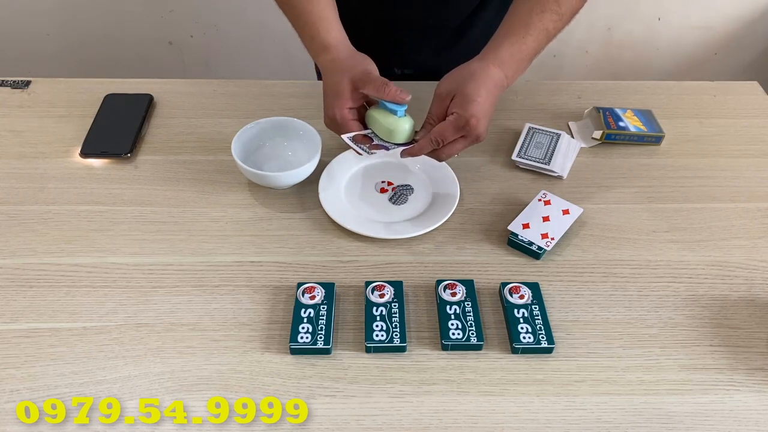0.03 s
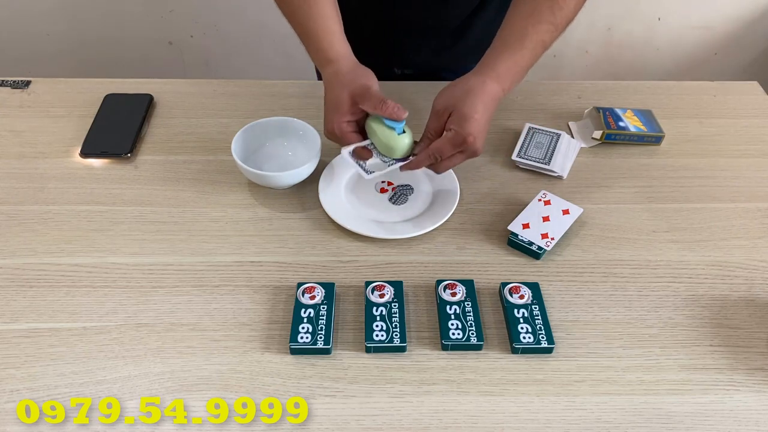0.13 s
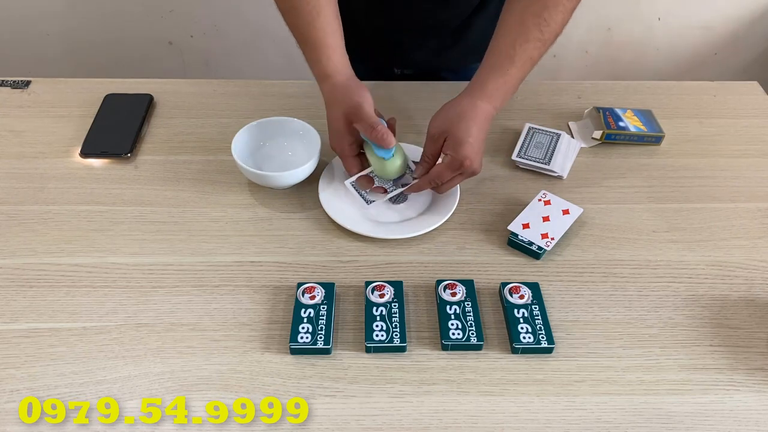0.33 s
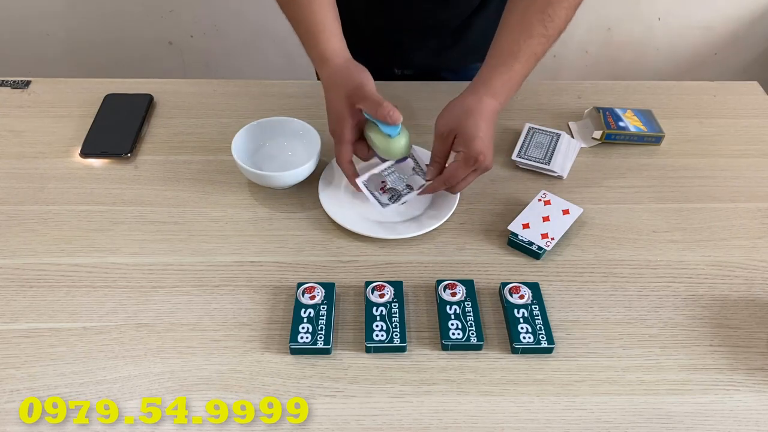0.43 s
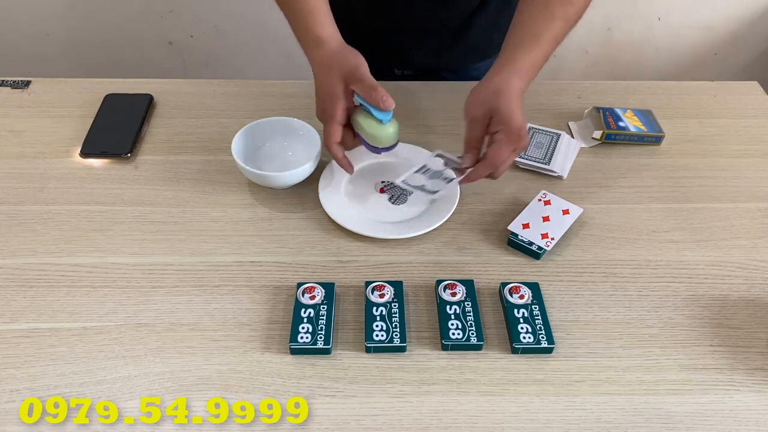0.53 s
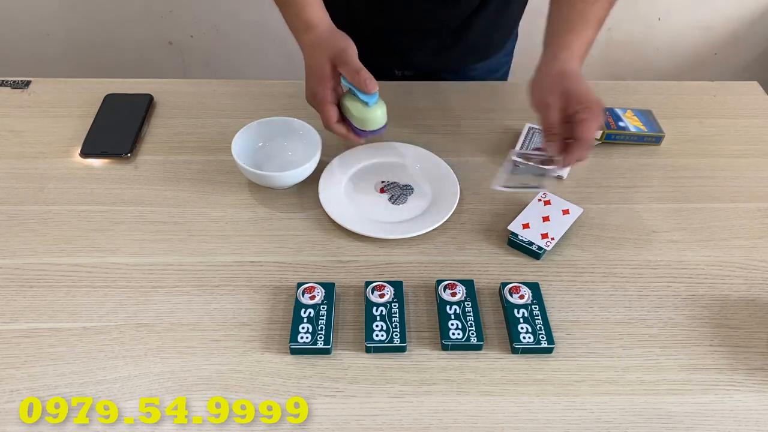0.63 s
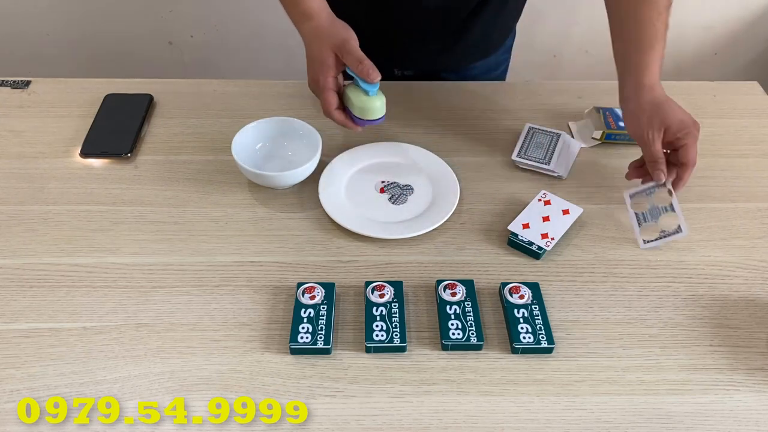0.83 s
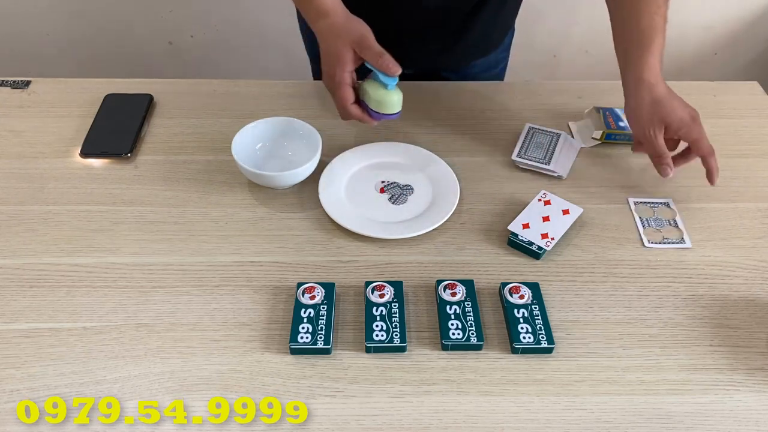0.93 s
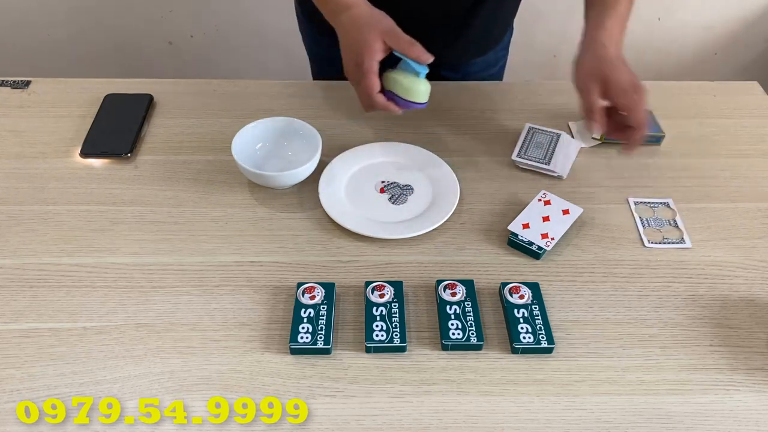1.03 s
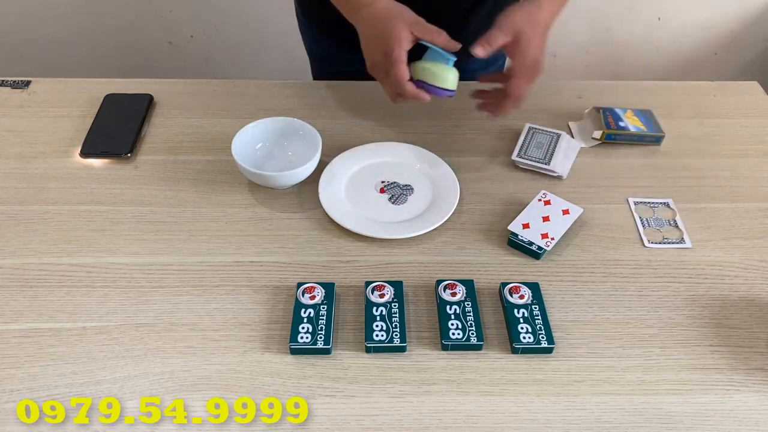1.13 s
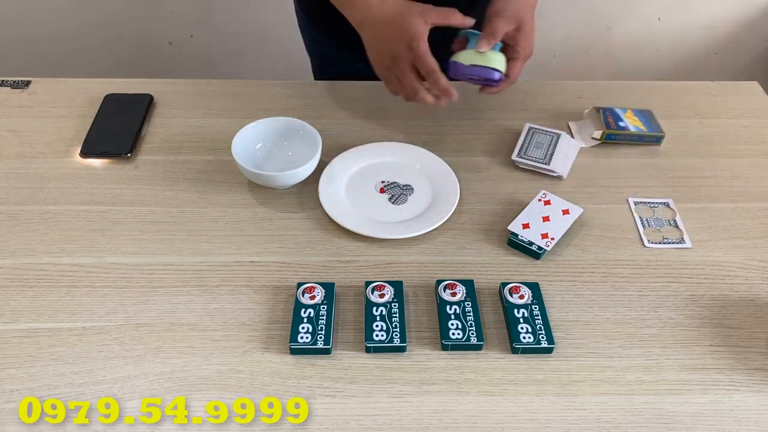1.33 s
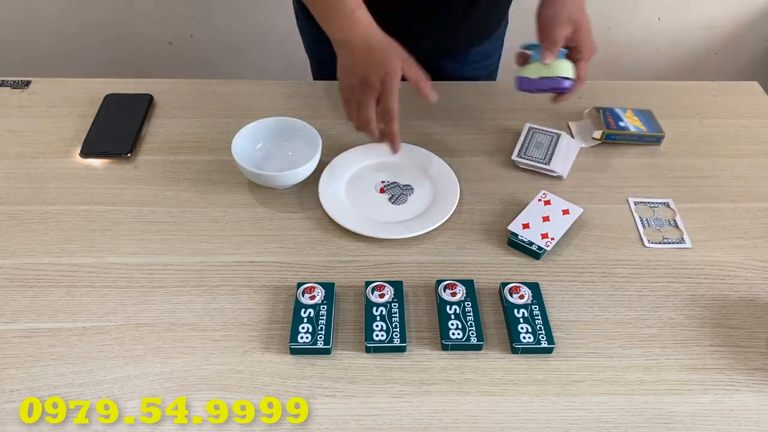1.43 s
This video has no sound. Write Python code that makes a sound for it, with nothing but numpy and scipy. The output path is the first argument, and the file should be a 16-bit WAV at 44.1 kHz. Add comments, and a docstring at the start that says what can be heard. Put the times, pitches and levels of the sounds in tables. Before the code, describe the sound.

Small creaky ticks lead to one hard, bright punch snap through card, followed by a lighter lever click, faint card taps on a table and quiet handling, in a reverberant room with low hum.

```python
"""A plastic lever punch is pressed through a playing card: its lever creaks in slips, each a ring and a tick,
the card tears with a crackle and a knock, and the die slams home in bright cracks and rings on.
The lever clicks and thumps back, card and fingers rub as grainy noise, and the dropped card taps the table.
Loose parts tick and skin squeaks as the punch is turned in the fingers; the hands bump dully.
A bare room echoes as fading noise; an appliance hums as a wavering sine over steady room noise."""
import sys
import numpy as np
from scipy import signal
from scipy.fft import rfft, irfft
from scipy.io import wavfile

SR = 44100
rng = np.random.default_rng(int(sys.argv[2]) if len(sys.argv) > 2 else 0)


def store_wav(level_fs):
    """Save 16-bit WAV to argv[1]."""
    pcm = np.round(np.clip(np.atleast_2d(level_fs), -1, 1) * 32767)
    wavfile.write(sys.argv[1], SR, pcm.T.astype(np.int16))


N = 66150
TIME = np.arange(N) / SR  # seconds
SIZE = 2 * N  # filters work at double length, so that tails do not wrap around
HZ = np.maximum(np.fft.rfftfreq(SIZE, 1 / SR), 1)

# In all tables, t60 is the time to fade by 60 dB.
# the lever slips under load: [t/s, level/dB]
LEVER_SLIPS = [(0.0665, -36), (0.081, -53), (0.1016, -28), (0.104, -27), (0.1067, -30), (0.111, -33),
               (0.16, -34.5), (0.194, -42.5), (0.201, -43)]
# tone of a slip's tick and of the tearing fibres: [f/Hz, level/dB]
TICK_SPECTRUM = [(200, -31.5), (500, -22.5), (800, -1.5), (1200, -6), (1700, 15.5), (2500, -4),
                 (5000, -2.5), (8000, -9), (14000, -4.5)]
# the die hits its stop and chatters: [t/s, level/dB, decay/s]
DIE_HITS = [(0.2138, -10.5, 0.00099), (0.2152, -5.5, 0.0015), (0.2181, -17.5, .002)]


def from_db(db):
    """Turn decibels into gain."""
    return 10 ** (np.asarray(db) / 20)


def rms_one(x):
    """Scale to an rms (average strength) of one."""
    return x / np.sqrt(np.mean(x ** 2) + 1e-20)


def at_hz(points, hz):
    """Read levels between the rows of a table, along a log-frequency axis."""
    table = np.array(points)
    return np.interp(np.log(hz), np.log(table[:, 0]), table[:, 1])


def causal(gain):
    """Build the filter that has these gains and answers only after its input (minimum phase)."""
    cepstrum = irfft(np.log(gain + 1e-9))
    folded = 2 * cepstrum[:len(gain) - 1]
    return np.exp(rfft(folded, len(cepstrum)) - cepstrum[0])


def colour(x, spectrum, tilt_db=0):
    """Filter with a spectrum, tilted in dB per octave from 1 to 16 kHz; keeps the power of white noise."""
    octaves = np.log2(np.clip(HZ, 1000, 16000))
    gain = rms_one(from_db(at_hz(spectrum, HZ) + tilt_db * octaves))
    return irfft(rfft(x, SIZE) * causal(gain))[:N]


def wide_noise(side_table):
    """White stereo noise: a shared middle plus an opposed side, whose share depends on frequency."""
    mid, side = rfft(rng.standard_normal((2, SIZE)))
    width = from_db(at_hz(side_table, HZ))
    pair = mid + width * side * [[1], [-1]]
    return irfft(pair / np.sqrt(1 + width ** 2))[:, :N]


def crack(start, db, decay_s, size=2048):
    """A contact: a dense run of tiny impacts, even in spectrum, that dies within milliseconds."""
    impacts = np.exp(-TIME[:size] / decay_s) * rng.choice([-1, 1], size)
    run = rfft(impacts, 2 * size)
    even = rms_one(irfft(run / np.abs(run))[:size])
    strength = from_db(db) * np.sqrt(decay_s * SR / 2 / size)  # longer runs carry more energy
    return strength * np.interp(TIME - start, TIME[:size], even, left=0, right=0)


def strike(hits, modes):
    """Each hit (t/s, level/dB) sets all the modes (f/Hz, level/dB, t60/s) ringing as fading sines."""
    out = np.zeros(N)
    for start, db in hits:
        first = int(start * SR) + 1
        age = TIME[first:first + N // 2] - start
        for hz, level, t60 in modes:
            fade = from_db(db + level - 60 * age / t60)
            out[first:first + len(age)] += fade * np.sin(2 * np.pi * hz * age)
    return out


def stroke(start, length):
    """Swell and fade of one hand movement."""
    return np.sin(np.pi * np.clip((TIME - start) / length, 0, 1))


def thin_bass(x):
    """Small plastic parts radiate no bass: a high-pass weakens what lies below 750 Hz."""
    return signal.sosfilt(signal.butter(2, 750, "high", fs=SR, output="sos"), x)


def lever_creak():
    """Stick and slip: each slip rings the loaded lever."""
    # resonances of the loaded lever: [f/Hz, level/dB, t60/s]
    lever_modes = [(1654, -4.5, 0.052), (1730, -15.5, 0.012), (1830, -17.5, 0.048)]
    return thin_bass(strike(LEVER_SLIPS, lever_modes))


def slip_ticks():
    """Each slip also makes a dry tick, a very short run of impacts."""
    tick_db, tick_decay_s = -3.5, 0.00073  # level against the slip
    ticks = sum(crack(start, db + tick_db, tick_decay_s) for start, db in LEVER_SLIPS)
    return colour(ticks, TICK_SPECTRUM)


def card_shear():
    """The card tears through: its fibres crackle, and the released shell knocks."""
    # the card gives way in quick tears: [t/s, level/dB]
    tears = [(0.2117, -19), (0.2128, -8)]
    # resonances of the shell's dull knock: [f/Hz, level/dB, t60/s]
    shell_modes = [(1020, -9.5, 0.0038), (1830, 0, 0.0072), (2900, -12.5, 0.019), (3900, -11.5, .008)]
    crackle_db, crackle_decay_s = -13.5, 0.0019  # level against the tear
    knock = thin_bass(strike(tears, shell_modes))
    crackle = sum(crack(start, db + crackle_db, crackle_decay_s) for start, db in tears)
    return knock + colour(crackle, TICK_SPECTRUM)


def die_slam():
    """The die cracks brightly against its stop, as short dense runs of impacts."""
    # tone of the slam: [f/Hz, level/dB]
    slam_spectrum = [(100, -33), (250, -20), (420, -16.5), (650, -23), (1000, -5.5), (1350, -5.5),
                     (1700, 0.5), (2400, -4.5), (3300, -2), (4600, -5.5), (6200, -0.5), (8000, -6),
                     (10000, 3.5), (12000, -3.5), (14200, 5.5), (15800, -8.5)]
    return colour(sum(crack(*row) for row in DIE_HITS), slam_spectrum)


def die_ring():
    """The first hit of the slam leaves the metal parts ringing briefly, all fading at one rate."""
    # resonances of die and spring: [f/Hz, level/dB]
    die_modes = [(1662, -0.5), (1717, -4.5), (2057, -3), (2440, -10.5), (2854, -4), (2899, -4),
                 (3144, -12.5), (3637, 1), (4650, -17.5), (6338, -5.5), (6419, -10), (7558, -14.5),
                 (14090, -12)]
    ring_db, t60_s = -29, 0.26
    first_hit_s = DIE_HITS[0][0]
    return strike([(first_hit_s, ring_db)], [(hz, db, t60_s) for hz, db in die_modes])


def plastic_clicks():
    """The lever springs back with clicks and a soft thump; loose parts tick as the punch is handled."""
    # light contacts of lever and shell: [t/s, level/dB, decay/s, tilt/dB per octave]
    contacts = [(0.388, -42, 0.0042, -18), (0.3908, -34.5, 0.0043, 1), (0.3955, -19, 0.0021, 8),
                (0.399, -39, .002, 17), (0.509, -42, 0.0092, -3), (0.517, -53.5, 0.0053, 2.5),
                (1.3729, -60, .004, 0), (1.4956, -35, 0.0083, -0.5)]
    # tone of the contacts before their tilt: [f/Hz, level/dB]
    click_spectrum = [(200, -8), (700, -20), (1400, 3.5), (2800, -2), (5000, -9), (10000, -5), (12000, -7),
                      (14500, -8)]
    # the lever's return thumps in the hand: [f/Hz, level/dB, t60/s]
    thump_modes = [(137.6, -53, 0.39), (181, -47, 0.42), (277.4, -53, 0.24), (363, -50.5, 0.11)]
    thump_s = 0.392
    clicks = sum(colour(crack(start, db, decay), click_spectrum, tilt) for start, db, decay, tilt in contacts)
    return clicks + strike([(thump_s, 0)], thump_modes)


def card_landing():
    """The dropped card taps the table a few times, each tap a short run of impacts."""
    # the card's edges land: [t/s, level/dB, decay/s]
    card_taps = [(0.918, -43.5, .002), (0.9475, -53, .0015), (0.9728, -39, .0012)]
    # tone of the taps: [f/Hz, level/dB]
    card_spectrum = [(200, -13), (1200, -4), (3000, -10.5), (7000, -13), (10000, -4), (15000, 1.5)]
    return colour(sum(crack(*row) for row in card_taps), card_spectrum)


def rubbing():
    """Sliding card and fingers make grainy noise: friction is uneven, so each sample's strength varies."""
    # slides of card and fingers: [start/s, length/s, level/dB, tilt/dB per octave]
    rubs = [(0.059, 0.12, -56.5, 1.5), (0.113, 0.24, -56, -1.5), (0.378, 0.071, -56, -3.5),
            (0.449, 0.1, -58, -1), (0.909, .1, -63, -1), (1.132, 0.15, -76.5, -6.5),
            (1.261, .1, -68.5, 0.5), (1.351, 0.23, -72, -2.5), (1.427, 0.011, -53.5, 2)]
    # tone of the rubs before their tilt: [f/Hz, level/dB]
    rub_spectrum = [(200, 2), (1000, 0.5), (3200, -2), (6500, -7.5), (10000, -3.5), (15000, -3.5)]
    grain_db = 5  # average boost of a grain, before levelling
    out = 0
    for start, length, db, tilt in rubs:
        boost = grain_db * np.minimum(rng.exponential(1, N), 6)
        grains = rms_one(rng.standard_normal(N) * from_db(boost))
        out = out + colour(from_db(db) * stroke(start, length) * grains, rub_spectrum, tilt)
    return out


def skin_squeaks():
    """Skin squeaks faintly on plastic: noise passed through a narrow resonance."""
    # squeaks of fingers on the shell: [start/s, length/s, f/Hz, level/dB]
    squeaks = [(1.16, 0.17, 3680, -81), (1.343, 0.095, 3280, -75)]
    width_hz = 160
    out = 0
    for start, length, hz, db in squeaks:
        resonance = signal.iirpeak(hz, hz / width_hz, fs=SR)
        tone = signal.lfilter(*resonance, rng.standard_normal(N))
        out = out + from_db(db) * stroke(start, length) * rms_one(tone)
    return out


def hand_bumps():
    """Dull bumps as the hands move: low, fading sines."""
    # the bumps: [t/s, level/dB]
    bumps = [(0.005, -52), (0.445, -52), (1.36, -59.5)]
    # their resonance: [f/Hz, level/dB, t60/s]
    bump_modes = [(51.23, 0.02, 0.38)]
    return strike(bumps, bump_modes)


def room_response():
    """Diffuse echo: noise that dies band by band, stronger at first from the table and the near wall."""
    # the echo's bands: [f/Hz, t60/s, level/dB]
    echo_bands = [(200, .6, 0.5), (700, 0.47, 2), (1500, 0.58, 0.5), (3000, .52, 3.5), (6000, 0.53, 3.5),
                  (10000, 0.57, -4), (15000, .33, -4)]
    # stereo width of the echo: [f/Hz, side level/dB]
    echo_width = [(60, -7.5), (180, -11), (550, 0.5), (1650, -1), (4970, 0), (15000, -1.5)]
    first_echo_s, early_db, early_decay_s = 0.0028, 6.5, 0.076
    noise, out = rfft(wide_noise(echo_width)), 0
    log_hz = np.log(HZ[::2])
    centres = np.log([row[0] for row in echo_bands])
    # each band takes its share of the noise, fading into its neighbours
    for share, (_, t60, db) in zip(np.eye(len(echo_bands)), echo_bands):
        band = irfft(noise * np.interp(log_hz, centres, share), N)
        fade = rms_one(np.exp(-np.log(1000) * TIME / t60))
        out = out + band * from_db(db) * fade / np.sqrt(N)
    early = from_db(early_db)
    boost = (1 + early * np.exp(-TIME / early_decay_s)) / (1 + early / 2)
    return out * (TIME > first_echo_s) * boost


def appliance_hum():
    """An appliance hums: a low sine whose level wavers at random."""
    hum_hz, hum_db, waver_db = 120.6, -58, 2
    waver = np.interp(TIME, np.linspace(0, TIME[-1], 30), rng.standard_normal(30))
    tone = np.sin(2 * np.pi * (hum_hz * TIME + rng.random()))
    return np.sqrt(2) * from_db(hum_db + waver_db * waver) * tone


def room_air():
    """Steady room noise: wide noise, strongest in the bass."""
    # tone of the noise, before levelling: [f/Hz, level/dB]
    air_spectrum = [(12, -46), (20, -19), (64, -14), (135, -2.5), (178, -20), (294, -20), (525, -22),
                    (818, -23), (914, -22.5), (1140, -24.5), (2340, -33.5), (3460, -36.5), (4690, -51.5),
                    (15000, -59.5)]
    # stereo width of the noise: [f/Hz, side level/dB]
    air_width = [(60, -12.5), (150, -13), (300, -5), (1000, 1.5), (4000, 0)]
    air = irfft(rfft(wide_noise(air_width)) * from_db(at_hz(air_spectrum, HZ[::2])), N)
    return from_db(-58) * rms_one(air)


def scene():
    """Each source reaches the microphones directly and through the room; bumps and background are added."""
    left_lead_s, pan_db = 0.000026, 0.5  # the left side hears it earlier and louder
    # each source with the level it sends into the room, in dB
    sources = [(lever_creak(), -7), (slip_ticks(), 1), (card_shear(), -6.5), (die_slam(), 1),
               (die_ring(), -19.5), (plastic_clicks(), -5), (card_landing(), -6),
               (rubbing() + skin_squeaks(), -5.5)]
    direct = rfft(sum(x for x, _ in sources), SIZE)
    sent = rfft(sum(x * from_db(db) for x, db in sources), SIZE)
    right = direct * np.exp(-2j * np.pi * HZ * left_lead_s)
    echo = sent * rfft(room_response(), SIZE)
    heard = irfft(np.array([direct, right]) + echo)[:, :N]
    panned = heard * from_db([[pan_db], [-pan_db]])
    return panned + hand_bumps() + appliance_hum() + room_air()


def record(dry):
    """The microphone's high treble is uneven, with a dip near 12 kHz; the top is cut steeply."""
    # the microphone's response: [f/Hz, level/dB]
    microphone = [(10800, -0.5), (11600, -7), (12100, -10.5), (12900, 2), (14200, 2.5), (15200, -0.5),
                  (15800, -6.5)]
    cutoff_hz = 15600
    heard = irfft(rfft(dry, SIZE) * causal(from_db(at_hz(microphone, HZ))))[:, :N]
    return signal.sosfilt(signal.ellip(10, 0.1, 80, cutoff_hz, fs=SR, output="sos"), heard)


dry = scene()
out = record(dry)
store_wav(out)
```